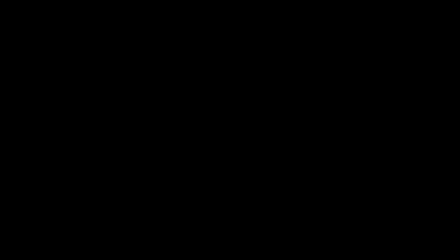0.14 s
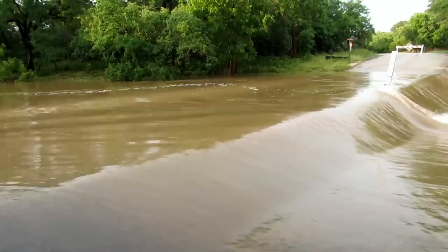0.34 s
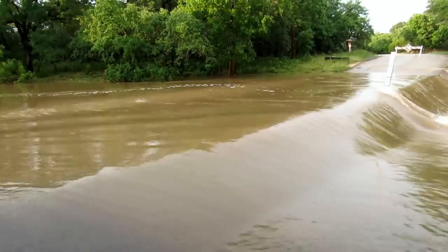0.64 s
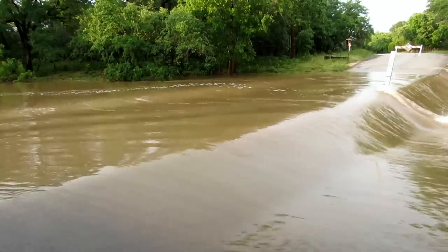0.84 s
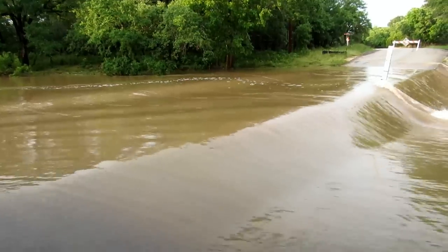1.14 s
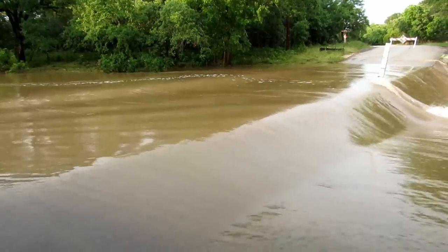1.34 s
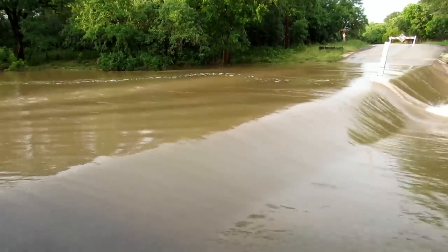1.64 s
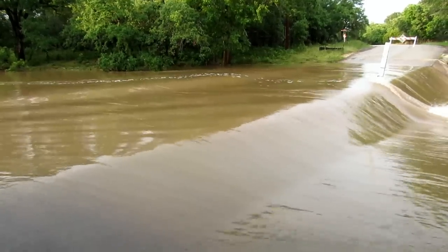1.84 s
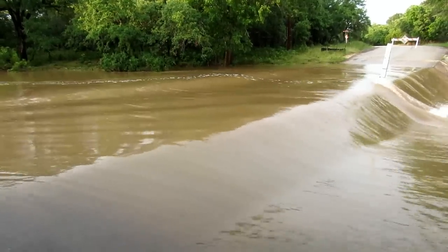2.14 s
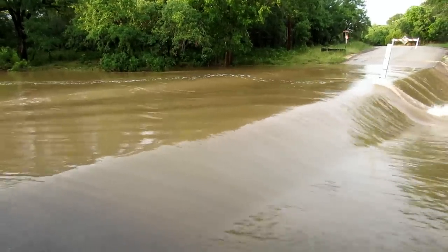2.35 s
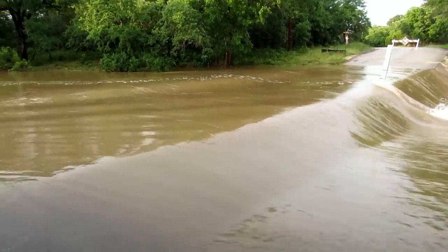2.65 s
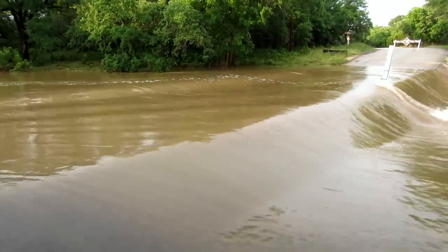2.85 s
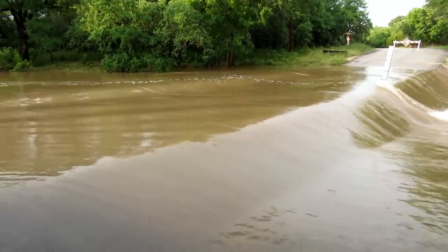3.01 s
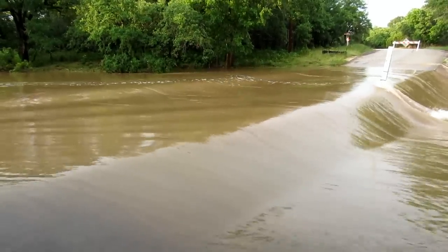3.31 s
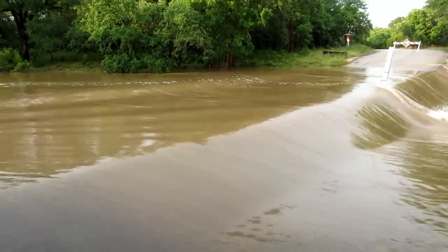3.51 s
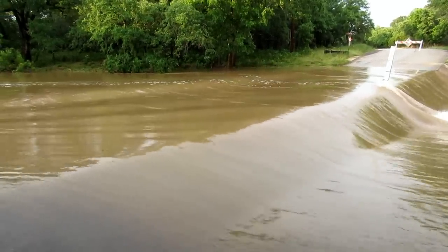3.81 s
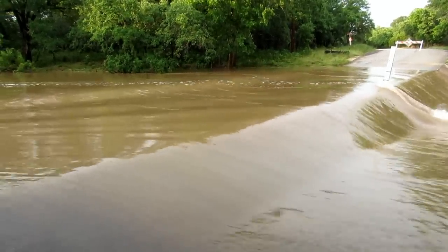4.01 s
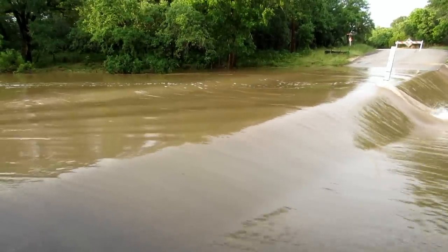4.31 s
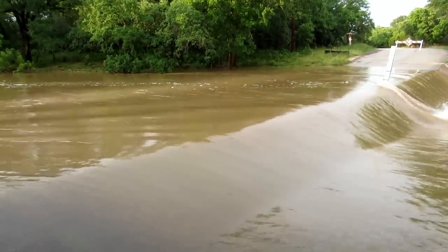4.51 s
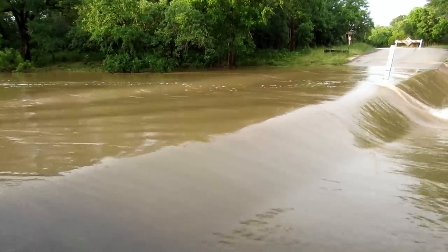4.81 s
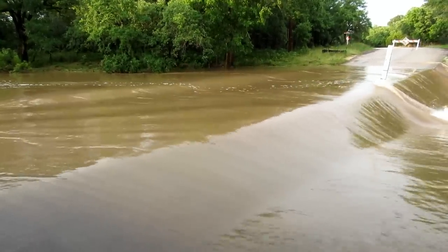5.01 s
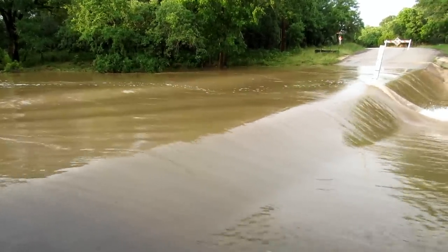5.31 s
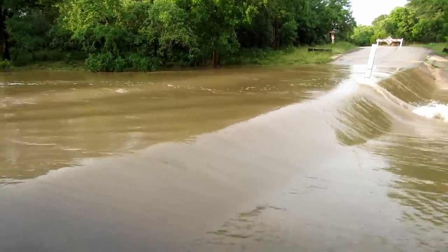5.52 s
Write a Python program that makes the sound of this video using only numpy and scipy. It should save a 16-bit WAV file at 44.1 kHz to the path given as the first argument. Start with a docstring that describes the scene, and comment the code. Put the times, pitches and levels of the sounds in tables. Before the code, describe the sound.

A heavy, continuous rush of water cuts in abruptly, low and gulping, with bubbling foam and fizzing spray, surging slightly until the end.

```python
"""Floodwater plunging off the downstream edge of a low road crossing, heard from the flooded road.
The plunge roars as churning noise with gulping air pockets; bubbles ring in the foam and spray fizzes above.
The smooth sheet of water in between mirrors the sound and cuts hollows into it.
Recorded on a camera with two close microphone ports and a limiter; it starts after a short silence."""
import sys
import numpy as np
from scipy import signal
from scipy.fft import rfft, irfft
from scipy.io import wavfile
from scipy.ndimage import uniform_filter1d

SR = 44100
rng = np.random.default_rng(int(sys.argv[2]) if len(sys.argv) > 2 else 0)


def log_audio(samples):
    """Write samples as a 16-bit WAV file to the path given in sys.argv[1]."""
    # one column per channel
    frames = np.atleast_2d(samples).T
    # limit to full scale, then quantise
    limited = np.clip(frames, -1, 1)
    pcm = np.round(limited * 32767).astype(np.int16)
    wavfile.write(sys.argv[1], SR, pcm)


N = 249590
HOP = 128  # samples between churn frames


def gain_of(db):
    """Decibels to amplitude gain."""
    return 10 ** (np.asarray(db) / 20)


def evened(x):
    """Scales to rms 1."""
    return x / np.sqrt(np.mean(x ** 2) + 1e-20)


def read(points, hz):
    """Reads a table on a log-frequency axis."""
    table_hz, value = np.transpose(points)
    return np.interp(np.log(hz + 1), np.log(table_hz + 1), value)


def churn(patch_db, patch_s, patch_hz, flicker_db):
    """Turbulent noise in short patches of time and pitch, with a flicker shared by all pitches."""
    frames, bins = N // HOP + 5, 2 * HOP + 1
    real, imaginary, patches = rng.standard_normal((3, frames, bins))

    # smooth random levels along time and pitch into patches
    over_time = np.exp(-(np.fft.fftfreq(frames, HOP / SR) * patch_s) ** 2)
    over_pitch = np.exp(-(np.fft.rfftfreq(bins, SR / 2 / bins) * patch_hz) ** 2)
    smoothed = np.fft.rfft2(patches) * np.outer(over_time, over_pitch)
    patches = evened(np.fft.irfft2(smoothed, patches.shape))

    flicker = evened(uniform_filter1d(rng.standard_normal((frames, 1)), size=3, axis=0))
    level_db = patch_db * patches + flicker_db * flicker
    spectrum = (real + 1j * imaginary) * gain_of(level_db)
    noise = signal.istft(spectrum.T, nperseg=4 * HOP, noverlap=3 * HOP)[1]
    return evened(noise[:N])


def bubbles(per_s, low_hz, high_hz, cycles, rise, spread_db, count=36):
    """Bubbles of many sizes: each rings, decays over `cycles` and rises in pitch; a few are much louder."""
    out = np.zeros(N)
    for hz in np.linspace(low_hz, high_hz, count):
        age = np.arange(0, 6, hz / (cycles * SR))  # in decay times
        # pitch rises by the share `rise` per decay time
        ring = np.exp(-age) * np.sin(2 * np.pi * cycles * age * (1 + rise * age / 2))
        births = np.flatnonzero(rng.random(N) < per_s / count / SR)
        loudness = np.minimum(rng.exponential(1, len(births)), 4)
        kicks = np.zeros(N)
        kicks[births] = gain_of(spread_db * loudness) * rng.choice([-1, 1], len(births))
        out += signal.oaconvolve(kicks, ring / np.linalg.norm(ring))[:N]
    return evened(out)


def spray():
    """Drops fall back and the finest bubbles burst in a fizz; others ring on as plinks."""
    fizz = bubbles(per_s=4000, low_hz=1994, high_hz=15130, cycles=5, rise=.03, spread_db=2.5)
    plinks = bubbles(per_s=260, low_hz=2403, high_hz=9500, cycles=27, rise=.01, spread_db=2)
    hiss = churn(patch_db=0.5, patch_s=0.033, patch_hz=900, flicker_db=.5)
    return hiss + gain_of(-7.5) * fizz + gain_of(-18) * plinks


def foam():
    """The white water seethes with ringing bubbles a few millimetres across."""
    blips = bubbles(per_s=800, low_hz=649, high_hz=2400, cycles=6.6, rise=0.034, spread_db=2.5)
    seethe = churn(patch_db=0.67, patch_s=0.045, patch_hz=500, flicker_db=0.45)
    return seethe + gain_of(-14.5) * blips


def plunge():
    """The falling sheet drives big pockets of air under, which throb and gulp."""
    gulps = bubbles(per_s=500, low_hz=129.4, high_hz=480, cycles=1.77, rise=0.031, spread_db=1.18)
    roar = churn(patch_db=.5, patch_s=.04, patch_hz=300, flicker_db=0.84)
    return roar + gain_of(-10.5) * gulps


# colour of the breaking water, relative within each range: pitch_hz, level_db
WATER_COLOUR = [(20, -32), (50, -5.5), (66, -6), (100, -1.5), (170, -1.4), (310, -0.03), (430, -2.5),
                (600, -4.5), (1100, -10), (2000, -16.5), (2850, -20.5), (3300, -23.5), (6100, -24),
                (9200, -25.5), (15300, -35.3)]
# likeness of the sound at the two ports: pitch_hz, coherence (0-1)
PORT_LIKENESS = [(100, 0.996), (400, 1), (680, 0.93), (1000, 0.99), (1550, 0.93), (2500, 0.98),
                 (4000, 0.95), (7500, 0.67), (10000, 0.75), (14000, 0.44)]
# level of the left port over the right: pitch_hz, left_minus_right_db
PORT_TILT = [(40, 1.5), (90, 1.9), (250, 1.9), (430, 2.6), (510, 1.8), (590, -1.3), (700, -2.5), (1100, -3),
             (1600, -3.7), (2200, -2.3), (3500, -1.2), (9000, -.5), (11500, .8), (15000, .2)]
# phase by which the left port leads: pitch_hz, left_lead_rad
PORT_LEAD = [(50, .1), (200, -.12), (380, -.35), (570, -.8), (780, -.35), (1400, -.38), (1650, -.08),
             (3800, -.1), (7300, -.8), (10000, -1), (12500, -1.6), (15500, -3)]
# sound mirrored by the water surface; ripples scatter the treble: pitch_hz, share (0-1)
SURFACE_MIRROR = [(300, 0.48), (680, 0.81), (1500, 0.14), (3000, 0.03), (5500, .1), (9000, 0)]
HOLLOW_HZ, HOLLOW_STEP_HZ = 688, 826  # a cancellation and the spacing to the next ones


def at_ports(source, low_hz, high_hz):
    """One range of the water, heard directly and off the water surface, at the two ports; rms 1."""
    hz = np.fft.rfftfreq(N, 1 / SR)
    band = 1 / np.sqrt((1 + (low_hz / (hz + 1)) ** 12) * (1 + (hz / high_hz) ** 12))

    # the mirrored path arrives in opposition at each hollow
    mirror_phase = np.exp(-2j * np.pi * (hz - HOLLOW_HZ) / HOLLOW_STEP_HZ)
    mirrored = np.clip(read(SURFACE_MIRROR, hz), 0, 1) * mirror_phase
    colour = band * gain_of(read(WATER_COLOUR, hz)) * (1 - mirrored)

    # the spill is wide, so part of it reaches the ports unalike
    alike = np.clip(read(PORT_LIKENESS, hz), 0, 1)
    shared = np.sqrt(1 + alike) * rfft(source())
    apart = np.sqrt(1 - alike) * rfft(source())

    # half of each port difference goes to the left, its inverse to the right
    port = gain_of(read(PORT_TILT, hz) / 2) * np.exp(.5j * read(PORT_LEAD, hz))
    left, right = (shared + apart) * port, (shared - apart) / port
    return evened(irfft(colour * np.array([left, right]), N))


# surge of the water over the edge, about the usual flow: time_s, surge_db
WATER_SURGE = [(0.5, 1.7), (0.93, -1.0), (1.45, 0.8), (2.08, -0.2), (2.4, 0.4), (2.82, 0.0), (3.05, -1.7),
               (3.35, 0.1), (3.78, 0.7), (4.15, -0.7), (4.5, -0.0), (4.68, -1.0), (5.3, 1.3), (5.55, -0.9)]
SPRAY_DB, FOAM_DB, PLUNGE_DB = -28.1, -23.4, -15.7  # rms levels at the usual flow, before the limiter
SPRAY_FOLLOW, FOAM_FOLLOW, PLUNGE_FOLLOW = .95, .85, .95  # dB gained per dB of surge


def scene():
    """One surging flow swells and eases spray, foam and plunge together."""
    surge_db = np.interp(np.arange(N) / SR, *np.transpose(WATER_SURGE))
    top = gain_of(SPRAY_DB + SPRAY_FOLLOW * surge_db) * at_ports(spray, low_hz=2330, high_hz=19900)
    middle = gain_of(FOAM_DB + FOAM_FOLLOW * surge_db) * at_ports(foam, low_hz=654, high_hz=2360)
    low = gain_of(PLUNGE_DB + PLUNGE_FOLLOW * surge_db) * at_ports(plunge, low_hz=15, high_hz=740)
    return low + middle + top


def limiter(x, ceiling_db, recover_db_per_s):
    """Crests over the ceiling in either port pull both down quickly; the gain then creeps back."""
    over_db = np.maximum(20 * np.log10(abs(x).max(0) + 1e-9) - ceiling_db, 0)
    recovery_db = np.arange(N) * recover_db_per_s / SR
    held_db = np.maximum.accumulate(over_db + recovery_db) - recovery_db
    reduction_db = signal.lfilter(np.ones(64) / 64, 1, held_db)  # averaged over 64 samples
    return x * gain_of(-reduction_db)


START_S, EDGE_HZ = 0.4705, 15650  # end of the opening silence; treble cutoff


def record(dry):
    """The camera starts abruptly, limits the crests and cuts the highest treble."""
    running = np.clip((np.arange(N) / SR - START_S) / .001, 0, 1)  # opens over 1 ms
    limited = limiter(dry * running, ceiling_db=-3.5, recover_db_per_s=17)
    lowpass = signal.firwin(511, EDGE_HZ, window=("kaiser", 9), fs=SR)
    return signal.oaconvolve(limited, lowpass[None], "same")


dry = scene()
out = record(dry)
log_audio(out)
```